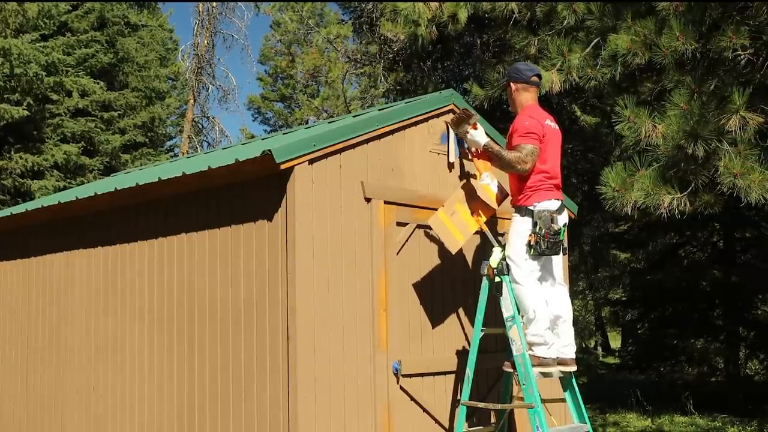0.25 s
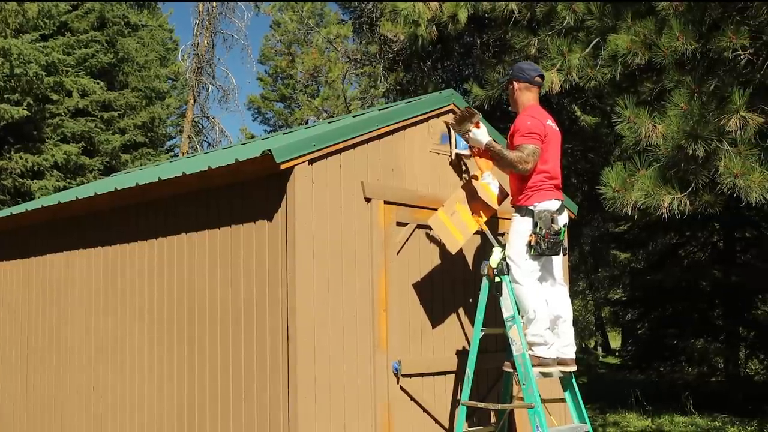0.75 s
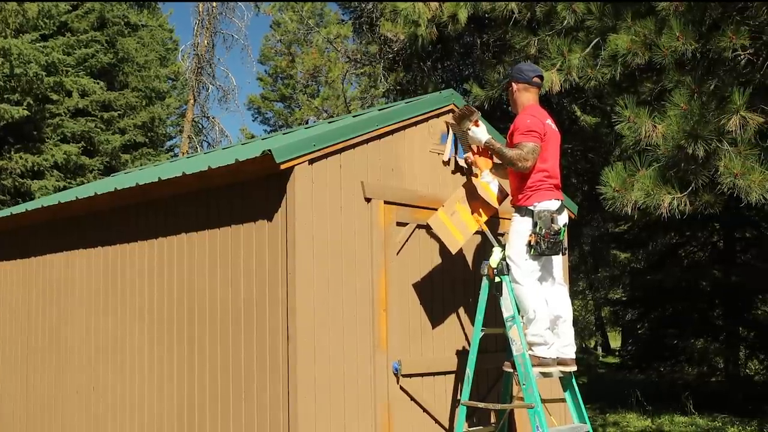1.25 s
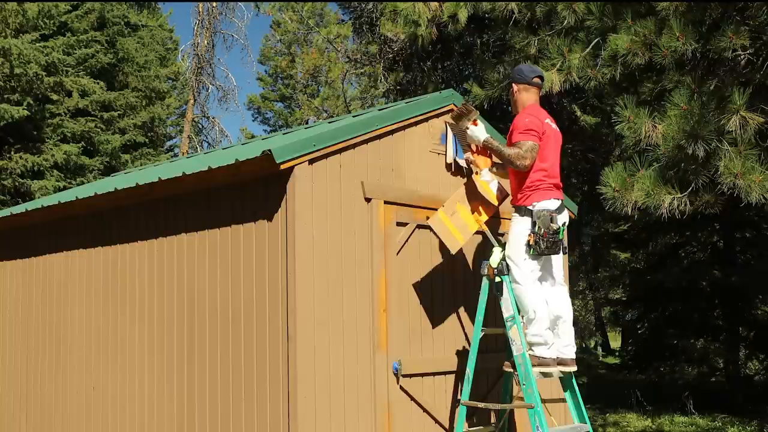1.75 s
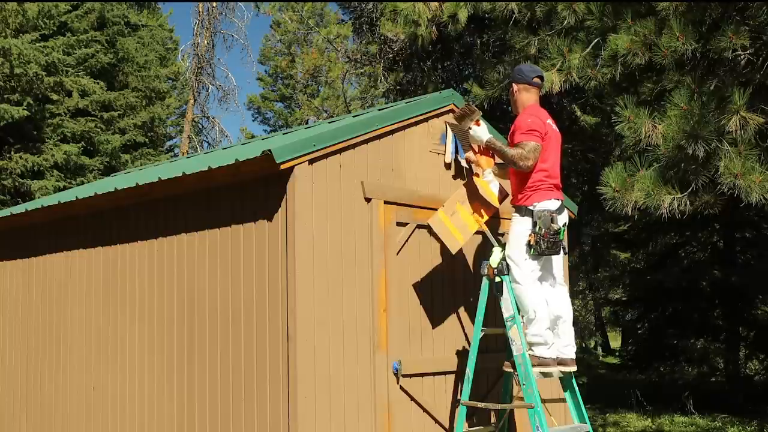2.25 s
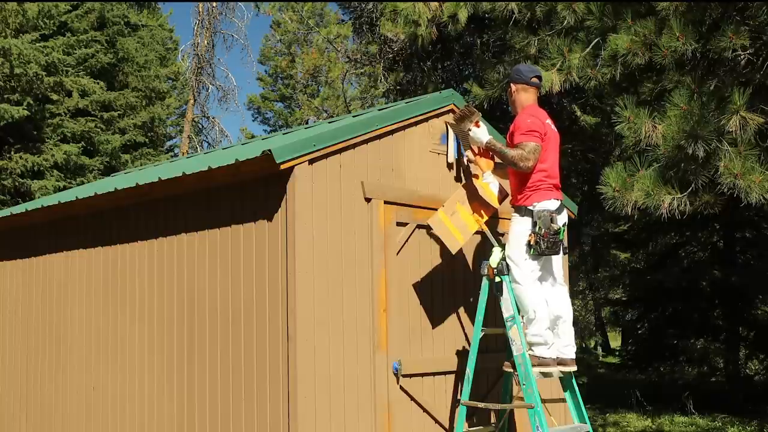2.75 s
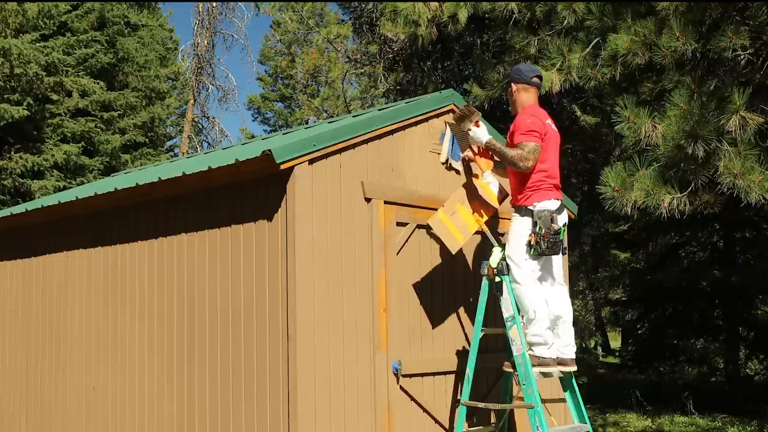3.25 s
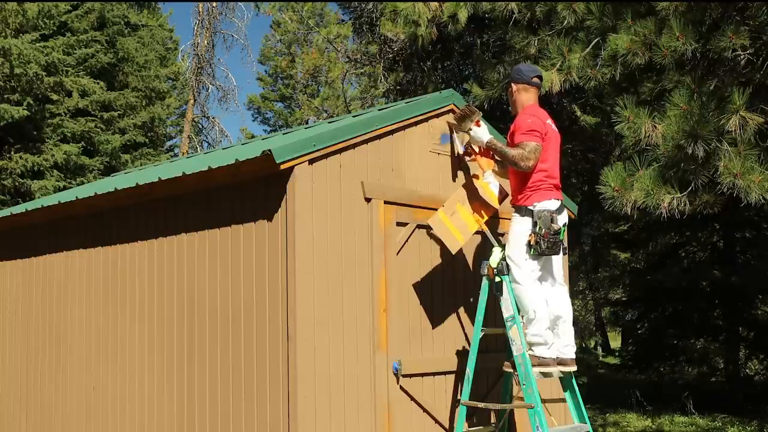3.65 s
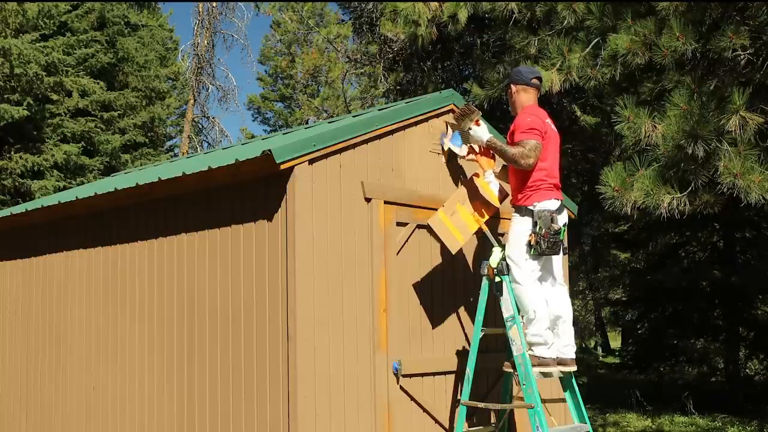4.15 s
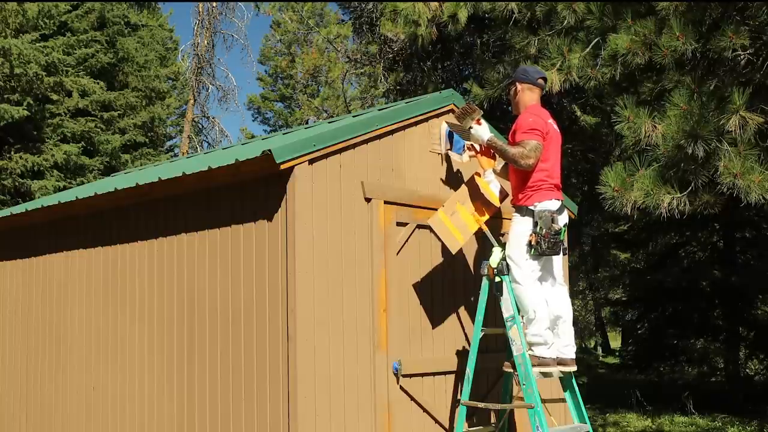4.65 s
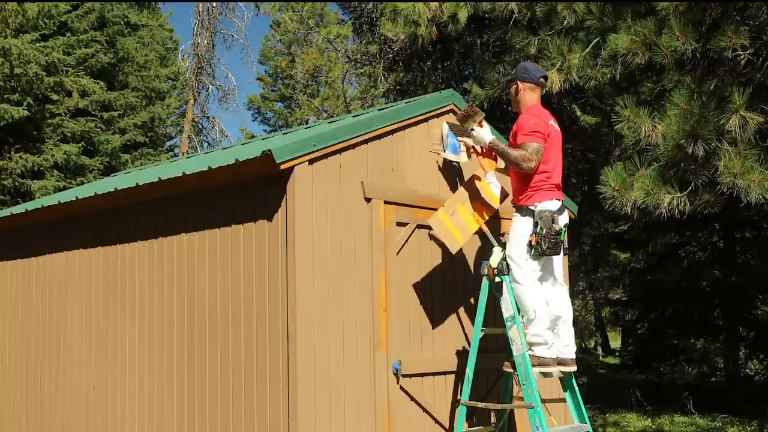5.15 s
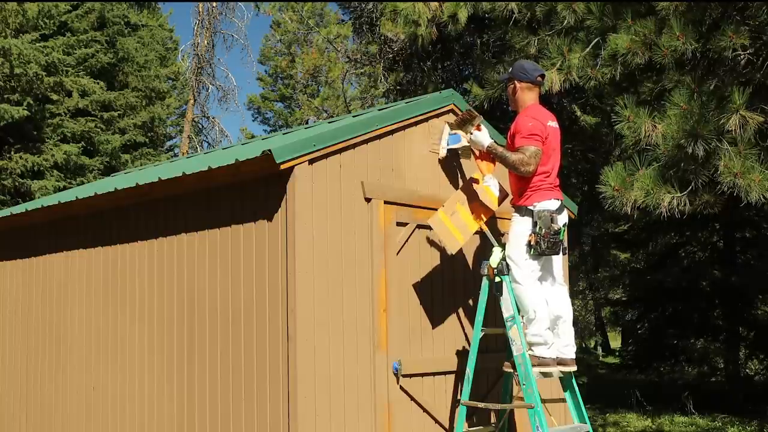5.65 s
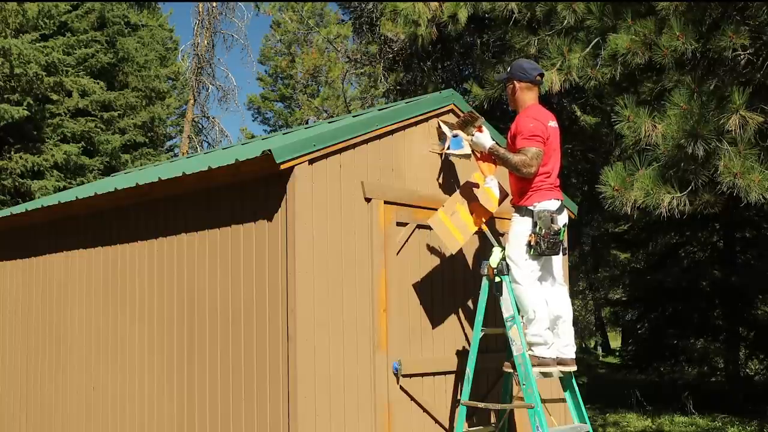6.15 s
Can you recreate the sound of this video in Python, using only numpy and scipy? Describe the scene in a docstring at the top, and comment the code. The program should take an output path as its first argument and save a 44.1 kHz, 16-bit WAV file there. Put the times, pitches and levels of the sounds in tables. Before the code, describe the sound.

Outdoors, masking tape and paper are tugged off a thin wooden wall in crisp, crackling bursts with sharp snaps and quiet pauses.

```python
"""Tape and paper pulled off a shed wall

Outdoors, masking tape and paper are pulled off a thin wooden wall and crumpled by hand.
Creases snap (resonant noise bursts) over a rustle of clumped tiny crackles (noise under a grainy envelope).
Tugs and the flapping sheet ring the wall panel's modes, with a boom near 96 Hz.
A far broad rush and a low rumble, both shaped noise, fill the pauses."""
import sys
import numpy as np
from scipy import signal
from scipy.fft import rfft, irfft, next_fast_len
from scipy.io import wavfile
from scipy.ndimage import uniform_filter1d, map_coordinates

SR = 44100
rng = np.random.default_rng(int(sys.argv[2]) if len(sys.argv) > 2 else 0)


def amplitude_ratio(level_db):
    """Convert a level in decibels to the matching linear amplitude (field) ratio."""
    exponent = np.asarray(level_db, float) / 20
    return 10 ** exponent


def unload_audio(sound):
    """Save the sound as a 16-bit wav file, at the path given as the first command line argument."""
    columns = np.transpose(np.atleast_2d(sound))
    # keep every value between -1 and 1, then stretch to whole-number steps
    steps = np.round(np.clip(columns, -1, 1) * 32767)
    wavfile.write(sys.argv[1], SR, steps.astype(np.int16))


N = 283122

# far rush and rumble over time: start_s, rush_db, rumble_db
AIR_LEVELS = [(0.0, -60.5, -61), (6.42, -65.5, -63.5)]
# spectrum of the far rush: freq_hz, relative_db
RUSH_SPECTRUM = [(150, -38), (250, -15), (410, -3), (500, -7.5), (800, 0.5), (1100, -2.5), (1440, -2),
                 (1800, -6.5), (2700, -19), (4000, -24), (6000, -30), (10000, -32.5), (15800, -44.5)]
# spectrum of the low rumble: freq_hz, relative_db
RUMBLE_SPECTRUM = [(12, -29.5), (20, -2), (86, -2.5), (108, -9), (193, -18), (221, -12.5), (245, -21),
                   (300, -34), (390, -64.5), (660, -120)]
# modes of the wall panel, the first two being the boom: mode_hz, level_db, t60_s
PANEL_MODES = [(43, -11.5, 0.15), (96, 5, 0.33), (176, -17, 0.091), (227, 5, 0.082), (346, -7.5, 0.054),
               (471, -5.5, 0.041)]
# tugs that reach the wall: start_s, relative_db, push_s, upper_modes_db
WALL_TUGS = [(0.251, -43, 0.0018, 0), (0.327, -46, 0.0053, 13), (0.457, -53, 0.0016, 16.5),
             (1.861, -41.5, 0.0024, 15.5), (1.868, -31.5, 0.0044, 1), (1.879, -59, 0.0027, 26),
             (1.98, -47.5, 0.0019, 3), (2.831, -48, 0.0031, 16.5), (2.916, -39.5, 0.0018, -2),
             (2.926, -21.5, 0.0062, 2), (3.629, -38.5, 0.0032, -12), (3.866, -42, 0.0028, -15),
             (3.976, -38, 0.0015, -2), (4.222, -38.5, 0.0038, -23), (4.451, -58, 0.0029, 2),
             (4.541, -48, 0.0014, 10.5), (5.278, -50, 0.0048, 11), (5.912, -37.5, 0.0013, -21),
             (5.928, -32, 0.002, -2.5), (6.001, -33, 0.0045, 7.5), (6.369, -45, 0.0032, -16)]
# the sheet never hangs quite still: time_s, crackle_db
IDLE_STIR = [(0, -79.5), (.7, -76), (1.2, -81), (1.8, -88), (2.05, -75), (2.5, -81.5), (3.0, -76),
             (3.3, -80), (3.47, -62.5), (3.58, -56), (3.62, -69), (4.16, -72.5), (4.2, -56.5), (4.3, -69),
             (4.37, -63.5), (4.75, -66.5), (4.9, -73), (5.3, -73.5), (5.65, -73.5), (6.42, -72.5)]
# small rustles between pulls: start_s, length_s, peak_crackle_db, middle_re_crackle_db
SMALL_RUSTLES = [(.66, .018, -43.5, -5.5), (.725, .04, -63, 2), (.78, .07, -70, -6), (.98, .07, -68, -1),
                 (1.077, .055, -63, -1), (1.388, 0.081, -64.5, -4), (1.7, 0.12, -72.5, 6.5),
                 (1.964, 0.038, -42, -3), (2.02, 0.075, -61.5, 0.5), (2.22, 0.024, -65, -3),
                 (2.384, .051, -68.5, -19), (2.604, .1, -68, -33), (2.987, .037, -69, 4),
                 (3.1, 0.088, -62, -18), (3.248, .089, -59, -20), (3.375, .03, -54, -29),
                 (3.41, .02, -57.5, -16), (3.44, 0.021, -50, -32), (4.168, .03, -49, -12),
                 (4.222, .025, -42, -4), (4.295, .03, -60.5, -21), (4.7, 0.11, -59, -0.5),
                 (4.81, .055, -57, -5), (4.883, .07, -65, -26), (5.03, 0.078, -58.5, -10.5),
                 (5.15, .028, -73, 17.5), (5.195, 0.025, -74.5, 14), (5.276, 0.026, -76, 13.5),
                 (5.3, .02, -67, -6), (5.37, 0.034, -61, -2), (5.44, .08, -78.5, 13.5),
                 (5.574, .04, -71.5, 14)]
# six pulls on the tape, each a list of:
# time_s, crackle_db, middle_re_crackle_db, middle_resonance_hz, middle_resonance_db, high_resonance_hz
TAPE_PULLS = [
    [(.02, -75, -8, 1900, 2, 10000), (.142, -47.5, -2, 2420, 4, 9800), (.26, -43.5, -2, 2650, 1, 8500),
     (.285, -39, -7, 2660, 13, 10500), (.39, -40.5, -5, 2760, 12, 6700), (.41, -42, -5.5, 2700, 8, 7000),
     (.46, -40.5, -7, 2500, 5, 7800), (.54, -46.5, -6, 3120, 12, 7700), (.575, -50, -12, 3140, 11, 7700),
     (.59, -55, -5, 3100, 17, 7800), (.615, -55, -1, 3070, 10, 7800)],
    [(1.85, -64.5, 15, 2370, 12, 9000), (1.858, -46.5, -3, 2350, 8, 9000), (1.878, -50, 6.5, 2700, 0, 9500),
     (1.904, -43, -4, 3030, 8, 10400), (1.934, -72, 9, 2980, -16, 10400), (1.95, -77, 17, 2480, -2, 10400)],
    [(2.73, -69.5, -6, 2490, 6, 9800), (2.75, -57.5, -12.5, 2450, 4, 9800),
     (2.785, -46.5, -9, 2490, 9, 9800), (2.815, -42, -12, 2470, 14, 10200),
     (2.852, -50.5, -2.5, 2700, 6, 10500), (2.9, -47.5, -8, 2500, 6, 10800),
     (2.918, -42, -5, 2300, 6, 11000), (2.97, -73, 4.5, 2200, -5, 11000)],
    [(3.585, -56.5, -9, 2600, 1, 7300), (3.62, -44.5, -6.5, 2600, 12, 8700),
     (3.66, -48.5, -5, 2680, 6, 7360), (3.72, -53.5, -4.5, 2660, -5, 9450), (3.79, -46, -16, 2700, 5, 9400),
     (3.83, -46, -4, 2690, 5, 7500), (3.9, -42, -8, 2610, 10, 7000), (3.945, -38, -7.5, 2550, -2, 6900),
     (3.995, -39, -7, 2900, 14, 9450), (4.02, -47, -6.5, 2430, 11, 8400), (4.085, -50, 2, 2030, 11, 7900),
     (4.14, -55, 3, 2160, 7, 8400), (4.16, -72.5, -6, 2110, 10, 8400)],
    [(4.372, -55.5, 3, 2500, 6, 10900), (4.408, -53, -13, 2900, 11, 7700),
     (4.43, -42, -11.5, 2800, 8, 8500), (4.464, -48, -1, 2280, 7.5, 9900),
     (4.524, -42.5, -5.5, 2300, 13, 9400), (4.565, -48, -0.5, 2620, 3, 8800),
     (4.58, -55, 0.5, 2400, 0, 8800), (4.6, -47.5, 2.5, 2100, 0, 9400), (4.645, -51, 2, 1900, 9, 9600),
     (4.7, -65, -11, 2010, 7, 9400)],
    [(5.65, -73, 9, 1900, 13, 6440), (5.69, -63, 7, 1980, 13, 7900), (5.752, -60, 4, 1910, 1, 7600),
     (5.822, -62.5, 4.5, 2100, 1, 8800), (5.86, -51, 1, 2420, 15, 7900), (5.89, -57, -1, 2400, 3.5, 8300),
     (5.92, -44.5, -1, 2480, 12, 8900), (6.0, -49, -5.5, 2350, 7, 8000), (6.1, -47, -3.5, 2300, 7.5, 8700),
     (6.28, -47, -4.5, 2270, 14, 8250), (6.42, -43.5, -6.5, 2600, 13, 9300)],
]
# what each pull does to the sheet: high_resonance_db, graininess (0-1)
PULLED_SHEETS = [(1.5, 0.33), (2, 0.5), (0.5, 0.57), (7, 0.38), (1.5, 0.51), (2, 0.24)]
# how freely the sheet flaps: time_s, flap_re_middle_db
FLAP_FREEDOM = [(0, -7), (.3, 4.5), (.55, 3), (1.85, 2.5), (1.9, -1), (2.75, 6.5), (2.82, 6), (2.93, 8),
                (3.6, 2), (3.9, 2), (4.0, 3), (4.1, -0.5), (4.4, 8.5), (4.62, 2.5), (5.2, 6.5), (5.7, 1),
                (5.92, 1.5), (6.0, 3), (6.42, 2)]
# spectrum of the sheet's crackle: freq_hz, relative_db
CRACKLE_SPECTRUM = [(1800, -19.5), (3000, 6), (4500, 4.5), (6500, 5), (9000, 4), (12400, 4), (15000, -5),
                    (15800, 6.5)]
# spectrum of the middle of the sheet: freq_hz, relative_db
MIDDLE_SPECTRUM = [(500, -3.5), (1000, 8), (1800, 4.5), (2500, -1.5), (3500, -1.5), (5000, -11),
                   (11000, -25)]
# spectrum of the flapping sheet: freq_hz, relative_db
FLAP_SPECTRUM = [(40, -6), (100, 4), (190, 1), (250, 1), (450, 1), (600, -6), (900, -7.5), (1500, -31)]
# creases that snap: start_s, peak_db, centre_hz, t60_s
CREASE_SNAPS = [(.1392, -32.5, 3550, .01), (.2772, -21, 13600, .02), (.304, -21.5, 4200, .02),
                (.3129, -21, 2710, .01), (.3233, -15, 2450, .007), (.3381, -27.5, 6740, .035),
                (.347, -26, 12700, .008), (.3557, -29.5, 6700, .02), (.3631, -21.5, 2450, .013),
                (.3737, -16, 6160, .02), (.3844, -23, 6100, .02), (.4202, -24, 6900, .014),
                (.4374, -22, 2300, .017), (.449, -22, 2450, .02), (.4754, -22, 7490, .015),
                (.4917, -26.5, 12500, .013), (.511, -27.5, 6430, .015), (.5188, -27, 3660, .014),
                (.529, -27, 4460, .013), (.5388, -28.5, 3300, .009), (.5543, -27, 6800, .007),
                (.5661, -33, 9900, .012), (.5702, -29, 3190, .013), (.625, -24.5, 3060, .0086),
                (.6682, -27, 6940, .008), (.6882, -29.5, 7600, .006), (.8486, -48, 3860, .01),
                (1.8572, -30.5, 2370, .009), (1.8968, -27, 3330, .006), (1.9015, -28.5, 4320, .014),
                (1.9094, -33.5, 3250, .006), (1.9814, -21.5, 6100, .0035), (1.9873, -32, 2410, .006),
                (2.2374, -49, 2330, .01), (2.614, -47, 9000, .0056), (2.6283, -49, 8440, .0055),
                (2.761, -39.5, 6730, .015), (2.7833, -24.5, 13200, .006), (2.7929, -26.5, 2410, .009),
                (2.8097, -24, 3420, .02), (2.8296, -28.5, 13400, .016), (2.9127, -24, 12500, .008),
                (2.9211, -34, 12100, .03), (3.1325, -46, 8650, .008), (3.3586, -50, 4470, .006),
                (3.3835, -42, 13300, .0065), (3.3912, -33, 2390, .009), (3.4179, -39, 12800, .012),
                (3.4492, -21.5, 13200, .005), (3.4534, -28.5, 6800, .006), (3.4973, -43.5, 7360, .006),
                (3.5275, -27, 7300, .006), (3.5509, -32, 6930, .006), (3.5676, -23.5, 6870, .0054),
                (3.5778, -31, 4100, .006), (3.5986, -33.5, 12790, .006), (3.6142, -33.5, 7020, .02),
                (3.6217, -24.5, 9200, .02), (3.6263, -31.5, 6980, .012), (3.6383, -25.5, 5990, .006),
                (3.7584, -35.5, 8800, .009), (3.7761, -22.5, 4360, .005), (3.7935, -25, 8900, .0054),
                (3.823, -23.5, 5800, .009), (3.8443, -26.5, 5940, .014), (3.865, -21, 5800, .008),
                (3.9125, -21, 6850, .012), (3.9398, -23.5, 10700, .018), (3.9538, -20.5, 6450, .009),
                (3.9885, -12.5, 9600, .008), (4.0021, -23.5, 8700, .006), (4.1741, -25.5, 3580, .005),
                (4.188, -22.5, 4200, .012), (4.2064, -30.5, 9220, .01), (4.2341, -27.5, 6200, .014),
                (4.2631, -29, 7100, .008), (4.3042, -38.5, 8800, .007), (4.334, -41.5, 6850, .012),
                (4.3609, -24, 12300, .012), (4.3965, -36, 6440, .012), (4.4192, -25, 3100, .006),
                (4.4288, -26.5, 8400, .01), (4.5284, -27.5, 5270, .007), (4.5924, -32.5, 3880, .015),
                (4.6162, -32.5, 2310, .012), (4.7, -48, 7240, .012), (4.7553, -45.5, 2370, .01),
                (4.7825, -48, 7050, .009), (4.7975, -43.5, 3140, .004), (4.8552, -45, 2330, .006),
                (5.032, -53.5, 7110, .008), (5.0515, -58, 12600, .009), (5.2599, -49, 3170, .008),
                (5.3082, -54, 8230, .015), (5.4233, -47.5, 7300, .01), (5.451, -56, 7300, .008),
                (5.7451, -36.5, 6700, .01), (5.8143, -39, 2630, .012), (5.8485, -27.5, 4500, .012),
                (5.8644, -28.5, 5940, .009), (5.9105, -25.5, 3730, .01), (5.9589, -27, 6680, .011),
                (5.9736, -27, 5770, .01)]
# folds that knock dully: start_s, peak_db, centre_hz, t60_s
FOLD_KNOCKS = [(.313, -27, 1320, .012), (0.8493, -45, 1210, .02), (0.934, -48, 1400, 0.0093),
               (1.9809, -24.5, 990, 0.0063), (2.7925, -25.5, 1400, .01), (3.5275, -38, 1480, 0.0082),
               (3.981, -29, 1450, .017), (4.181, -36.5, 770, .014), (4.4763, -32.5, 770, .012),
               (4.519, -31, 850, 0.013), (4.5646, -33, 666, .01), (4.643, -33.5, 1740, 0.015),
               (4.7254, -40, 1760, 0.016), (4.7975, -42, 690, 0.007), (5.1658, -35.5, 970, 0.007),
               (5.2077, -37.5, 740, 0.025), (5.286, -46, 660, .012), (5.3866, -53, 950, 0.014),
               (5.5887, -48.5, 890, 0.011), (5.664, -34, 1010, 0.0091), (5.7261, -45, 1370, .01),
               (5.745, -31.5, 1660, 0.0093), (5.768, -36, 1680, .011), (5.869, -35, 890, 0.0098),
               (5.9188, -25.5, 880, 0.0076), (5.9958, -29, 1390, .005), (6.1467, -33.5, 2270, .007),
               (6.2543, -33, 2200, 0.01), (6.3726, -32, 2360, .01)]

IDLE_MIDDLE_RE_CRACKLE_DB, IDLE_GRAININESS = -6, 0.067
RUSTLE_RISE_SHARE, RUSTLE_GRAININESS = .4, 0.79  # share of a rustle spent rising
SLACK_HZ = 2500  # placeholder centre: no resonance stands out while the sheet is slack
PULL_EDGE_S = .012  # fade at the ends of a pull
SNAP_DULL_DB, SNAP_DULL_HZ, SNAP_DULL_SCATTER = -25, 1300, .4  # scatter: sd of log pitch
KNOCK_BRIGHT_DB, KNOCK_BRIGHT_HZ = -18, 3000
STRAY_COUNT, STRAY_LOW_HZ, STRAY_HIGH_HZ, STRAY_T60_S = 80, 2300, 12400, .005
STRAY_RE_CRACKLE_DB, STRAY_SCATTER_DB = 12.5, 3
STRAY_CROWD = .6  # lesser snaps crowd where the rustle is loud
BAND_HZ = 15800


def unit(x):
    """Scale to rms 1."""
    return x / np.sqrt(np.mean(x ** 2) + 1e-20)


def curves(rows):
    """One value per sample for each column after the time."""
    time_s, *columns = np.transpose(rows)
    return [np.interp(np.arange(N) / SR, time_s, c) for c in columns]


def wobble(rate_hz):
    """A smooth random curve, rate_hz knots a second."""
    knots = rng.standard_normal(int(N * rate_hz / SR) + 4)
    return map_coordinates(knots, [np.arange(N) * rate_hz / SR])


def coloured(x, spectrum):
    """x filtered through (Hz, dB) points on a log axis, scaled to rms 1."""
    m = next_fast_len(N + 8192)
    hz, db = np.transpose(spectrum)
    log_hz = np.log(np.fft.rfftfreq(m, 1 / SR) + 1)
    gain = amplitude_ratio(np.interp(log_hz, np.log(hz), db))
    return unit(irfft(rfft(x, m) * gain, m)[:N])


def patchy(x, patchy_db, size=5):
    """Random patches of gain in time and frequency, lasting about size x 3 ms."""
    z = signal.stft(x, nperseg=256)[2]
    field = uniform_filter1d(rng.standard_normal(z.shape), size=4, axis=0)
    field = uniform_filter1d(field, size=size, axis=1)
    return signal.istft(z * amplitude_ratio(patchy_db * unit(field)), nperseg=256)[1][:N]


def focused(x, centre_hz, boost_db, width):
    """A resonance whose centre and strength change with the free length of the sheet."""
    hz, frame_s, z = signal.stft(x, SR, nperseg=256)
    sample_s = np.arange(N) / SR
    centre = np.interp(frame_s, sample_s, centre_hz)
    boost = np.interp(frame_s, sample_s, boost_db)
    distance = np.log((hz[:, None] + 1) / centre) / width
    return signal.istft(z * amplitude_ratio(boost * np.exp(-distance ** 2)), nperseg=256)[1][:N]


def air():
    """A far smooth rush and a lumpy low rumble, each shaped noise with a wandering level."""
    rush_db, rumble_db = curves(AIR_LEVELS)
    rush = coloured(patchy(rng.standard_normal(N), patchy_db=1.85), RUSH_SPECTRUM)
    rumble = coloured(rng.standard_normal(N), RUMBLE_SPECTRUM)
    rush_gain = amplitude_ratio(rush_db + 0.73 * wobble(5.53))
    rumble_gain = amplitude_ratio(rumble_db + 1.3 * wobble(9))
    return rush_gain * rush + rumble_gain * rumble


def wall(flap):
    """Soft pushes, and the flapping sheet stuck to it, set the panel's modes ringing."""
    t = np.arange(SR // 2) / SR
    force = np.zeros((2, N + SR))  # on the boom, on the modes above it
    for start_s, db, push_s, upper_db in WALL_TUGS:
        push = np.gradient(t / push_s * np.exp(-t / push_s)) / push_s / 600
        gain = amplitude_ratio([[db + 5.5], [db + upper_db + 5.5]])
        force[:, round(start_s * SR):][:, :len(t)] += gain * push
    force = force[:, :N] + amplitude_ratio(-64) * flap
    rings = [amplitude_ratio(db - 60 * t / t60_s) * np.sin(2 * np.pi * hz * t) for hz, db, t60_s in PANEL_MODES]
    modes = np.array([sum(rings[:2]), sum(rings[2:])])
    return signal.fftconvolve(force, modes, axes=1)[:, :N].sum(axis=0)


def handling():
    """Stir, rustles and pulls give crackle, middle and flap gains, two resonances and the graininess."""
    t = np.arange(N) / SR
    gains = amplitude_ratio(curves(IDLE_STIR)[0] + np.array([[0], [IDLE_MIDDLE_RE_CRACKLE_DB]]))
    # rows: middle_hz, middle_boost_db, high_hz, high_boost_db, graininess
    shape = np.outer([SLACK_HZ, 0, SLACK_HZ, 0, IDLE_GRAININESS], np.ones(N))
    for start_s, length_s, db, middle_db in SMALL_RUSTLES:
        corners_s = start_s + length_s * np.array([0, RUSTLE_RISE_SHARE, 1])
        swell = np.interp(t, corners_s, [0, 1, 0])
        gains += swell * amplitude_ratio([[db], [db + middle_db]])
        shape[4, swell > 0] = RUSTLE_GRAININESS
    for rows, (high_db, graininess) in zip(TAPE_PULLS, PULLED_SHEETS):
        db, middle_db, *tones = curves(rows)
        to_edge_s = np.minimum(t - rows[0][0], rows[-1][0] + PULL_EDGE_S - t)
        fade = np.clip(to_edge_s / PULL_EDGE_S, 0, 1)
        gains += fade * amplitude_ratio([db, db + middle_db])
        on = fade > 0
        shape[:3, on] = np.array(tones)[:, on]
        shape[3:, on] = [[high_db], [graininess]]
    crackle_gain, middle_gain = gains
    flap_gain = middle_gain * amplitude_ratio(curves(FLAP_FREEDOM)[0])
    return [crackle_gain, middle_gain, flap_gain], shape


def crackling(rate_hz, spread_db, life_s, bed):
    """Envelope of many small crackles: sudden starts of very uneven size, in clumps, on a steady bed."""
    chance, size = rng.random((2, N))
    clumps = np.exp(.8 * wobble(25))  # varies the rate
    starts = chance < rate_hz / SR * clumps
    sizes = starts * amplitude_ratio(-spread_db * np.log(size + .005))
    energy = signal.lfilter([1], [1, -np.exp(-2 / (life_s * SR))], sizes ** 2)
    return np.sqrt(bed ** 2 + energy / energy.mean())


def paper(gains, shape):
    """The same crackles sound in three parts of the sheet, the lower ones smoother."""
    middle_hz, middle_boost_db, high_hz, high_boost_db, graininess = shape
    grain = crackling(rate_hz=550, spread_db=4.0, life_s=.0012, bed=0.26) ** (1.1 * graininess)
    grain /= np.sqrt(abs(uniform_filter1d(grain ** 2, size=8000)))  # graininess leaves the loudness alone
    noise = rng.standard_normal((3, N))
    crackle = coloured(patchy(grain * noise[0], patchy_db=1.7, size=16), CRACKLE_SPECTRUM)
    crackle = focused(crackle, high_hz, high_boost_db, width=0.24)
    middle = coloured(patchy(grain ** 0.99 * noise[1], patchy_db=2.0), MIDDLE_SPECTRUM)
    middle = focused(middle, middle_hz, middle_boost_db, width=0.16)
    flap = coloured(grain ** 0.61 * amplitude_ratio(2.0 * wobble(23)) * noise[2], FLAP_SPECTRUM)
    return gains[0] * crackle + gains[1] * middle, gains[2] * flap


def creases(crackle_gain):
    """Rows (start_s, peak_db, hz, dull_db, dull_hz, t60_s): snaps, knocks, lesser snaps strewn by chance."""
    crackle_db = 20 * np.log10(crackle_gain)
    odds = np.cumsum(amplitude_ratio(2 * STRAY_CROWD * crackle_db))
    when, pitch = rng.random((STRAY_COUNT, 2)).T
    at = np.minimum(np.searchsorted(odds, when * odds[-1]), N - 1)
    scatter_db = STRAY_SCATTER_DB * rng.standard_normal(STRAY_COUNT)
    stray_db = crackle_db[at] + STRAY_RE_CRACKLE_DB + scatter_db
    stray_hz = STRAY_LOW_HZ * (STRAY_HIGH_HZ / STRAY_LOW_HZ) ** pitch
    strays = [(i / SR, db, hz, STRAY_T60_S) for i, db, hz in zip(at, stray_db, stray_hz)]
    bright = list(CREASE_SNAPS) + strays
    dull_hz = SNAP_DULL_HZ * np.exp(SNAP_DULL_SCATTER * rng.standard_normal(len(bright)))
    snap_rows = [(s, db, hz, SNAP_DULL_DB, dull, t60_s) for (s, db, hz, t60_s), dull in zip(bright, dull_hz)]
    # a knock is a snap whose dull part dominates
    knock_rows = [(s, db + KNOCK_BRIGHT_DB, KNOCK_BRIGHT_HZ, -KNOCK_BRIGHT_DB, hz, t60_s)
                  for s, db, hz, t60_s in FOLD_KNOCKS]
    return snap_rows + knock_rows


def snaps(rows):
    """A sharp noise crack with a weaker, longer tail, through one sheet resonance, plus a dull knock."""
    size = 4096
    out = np.zeros(N + size)
    t, f = np.arange(size) / SR, np.fft.rfftfreq(size, 1 / SR)

    def resonance(hz, width_hz):
        """Frequency response of one band-pass resonance."""
        return 1j * f * width_hz / (hz * hz - f * f + 1j * f * width_hz)

    noises = rng.standard_normal((len(rows), size))
    for (start_s, db, hz, dull_db, dull_hz, t60_s), noise in zip(rows, noises):
        fall_db = -60 * t / t60_s
        burst = rfft(noise * (amplitude_ratio(fall_db) + 0.043 * amplitude_ratio(0.6 * fall_db)))
        bright = irfft(burst * resonance(6000, 20000) * (0.3 + resonance(hz, 0.07 * hz)), size)
        dull = irfft(burst * resonance(dull_hz, 0.26 * dull_hz), size)
        sound = bright / abs(bright).max() + amplitude_ratio(dull_db) * dull / abs(dull).max()
        out[round(start_s * SR):][:size] += amplitude_ratio(db) * sound
    return out[:N]


def scene():
    """Paper with one echo off the eaves, wall and air."""
    gains, shape = handling()
    rustle, flap = paper(gains, shape)
    near = rustle + snaps(creases(gains[0]))
    echo = np.pad(near, (round(.004 * SR), 0))[:N]
    return (near + amplitude_ratio(-30.0) * echo + flap + wall(flap) + air())[None]


def low_pass(x):
    """Removes everything above the highest recorded frequency."""
    return signal.sosfilt(signal.butter(12, 16990, fs=SR, output="sos"), x)


def record(dry):
    """A sharp low-pass removes all above the band limit."""
    m = next_fast_len(N)
    passed = np.fft.rfftfreq(m, 1 / SR) < BAND_HZ
    mix = irfft(rfft(dry, m) * passed, m)[:, :N]
    return low_pass(mix)


dry = scene()
out = record(dry)
unload_audio(out)
```